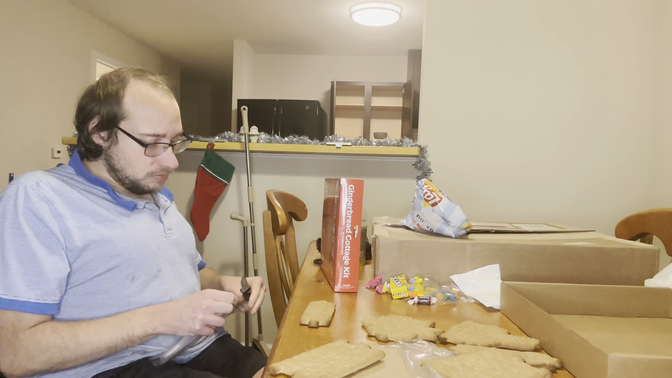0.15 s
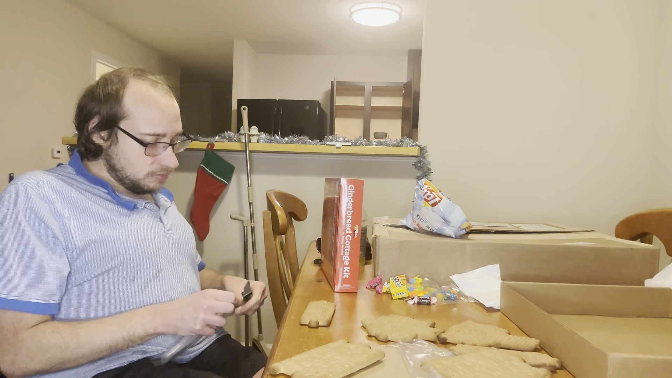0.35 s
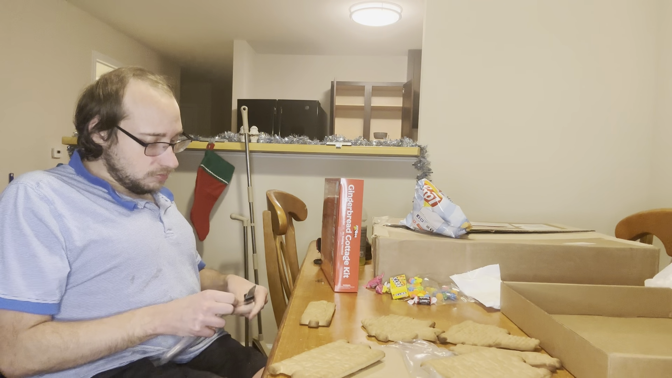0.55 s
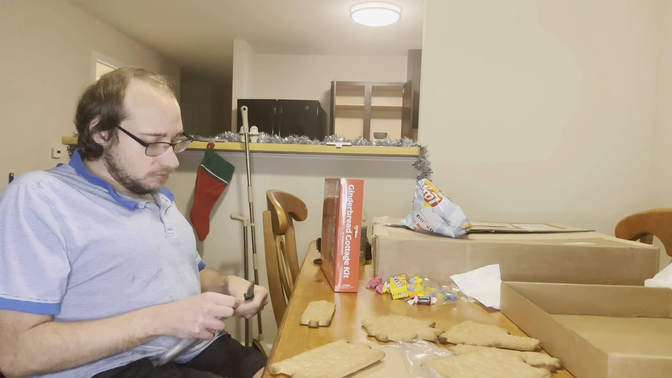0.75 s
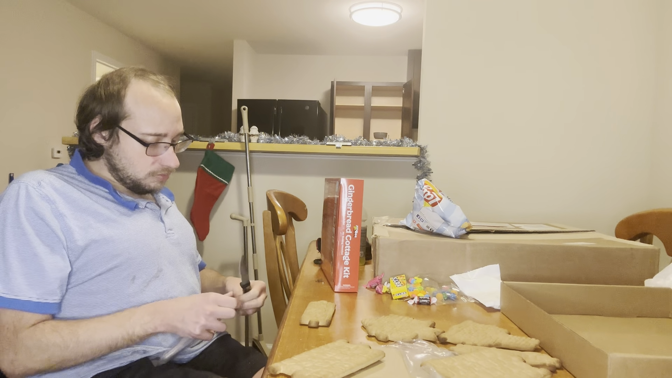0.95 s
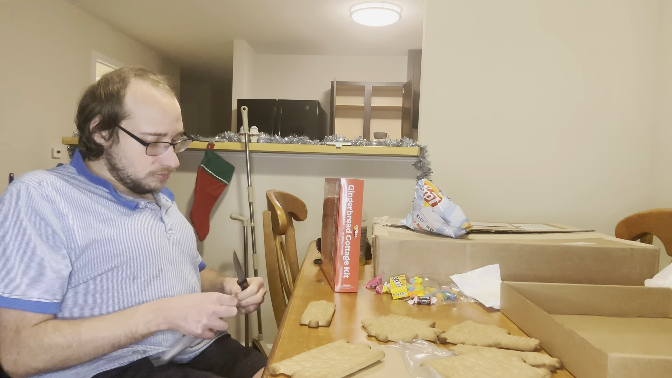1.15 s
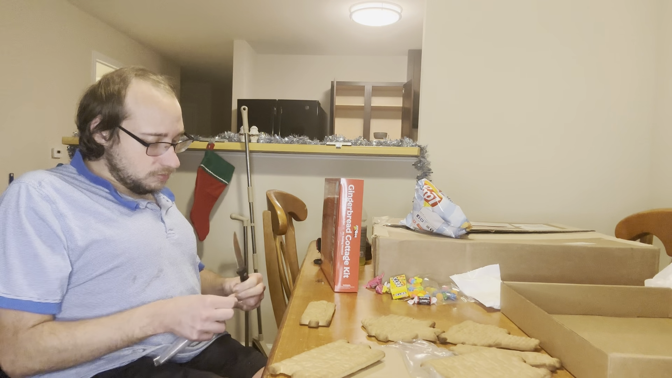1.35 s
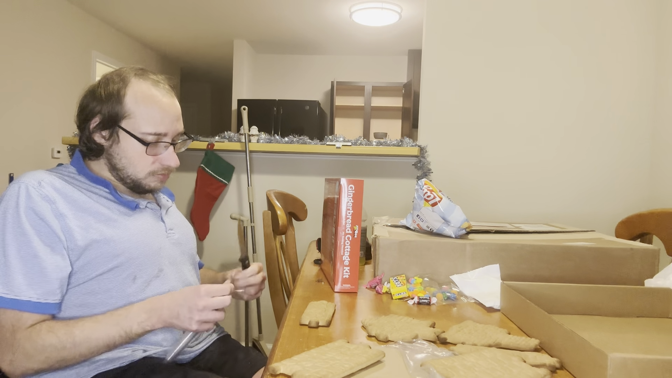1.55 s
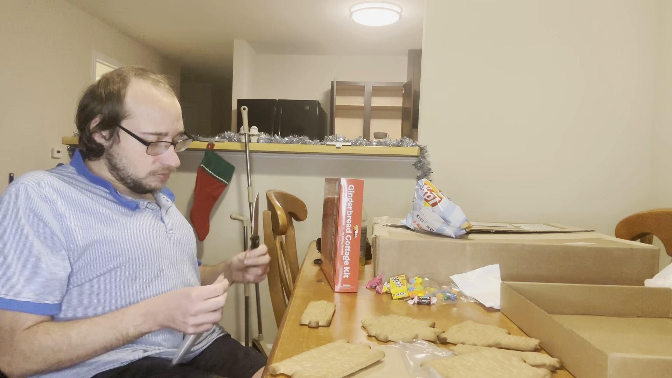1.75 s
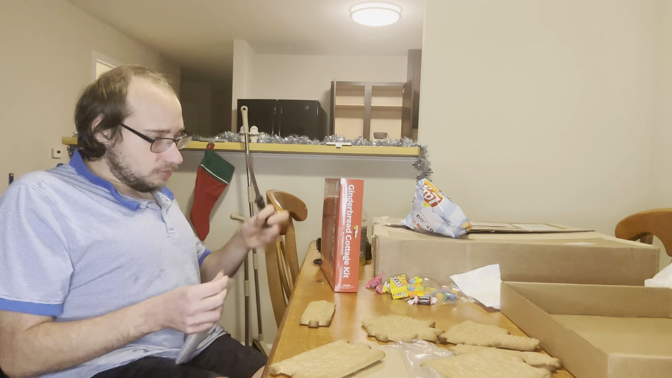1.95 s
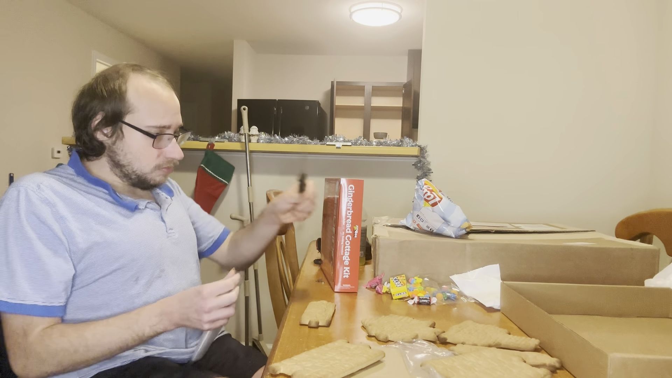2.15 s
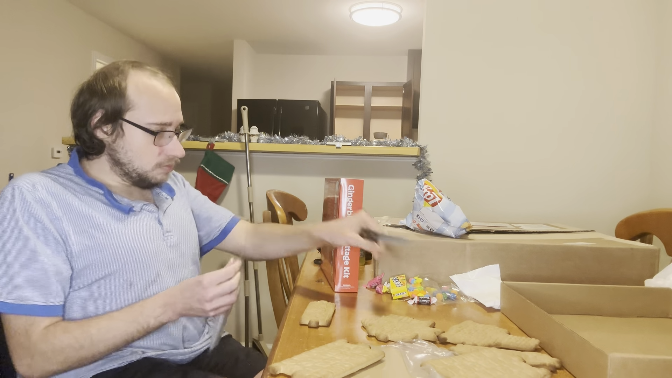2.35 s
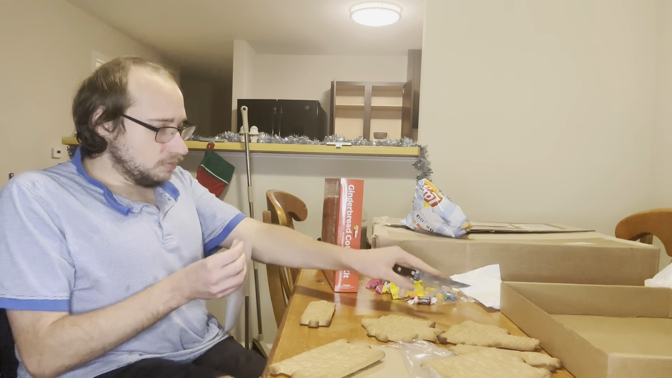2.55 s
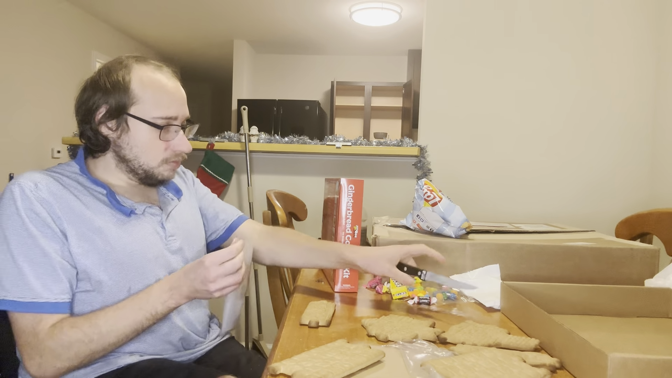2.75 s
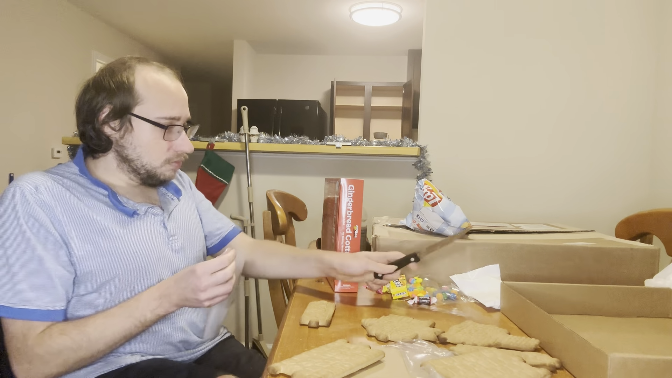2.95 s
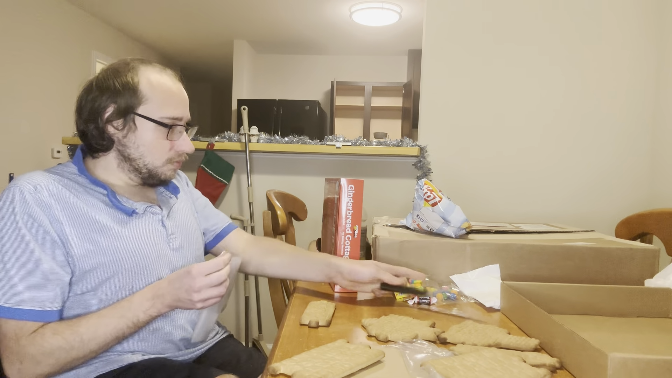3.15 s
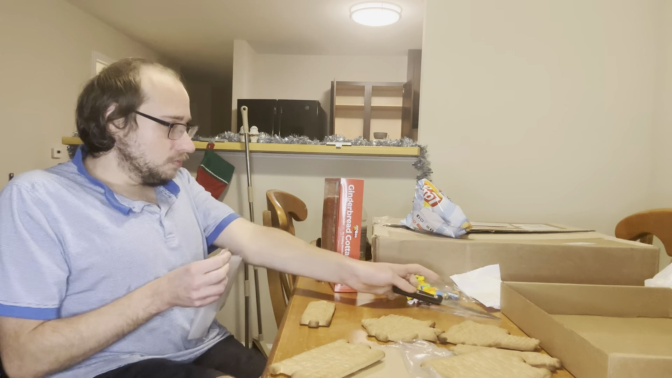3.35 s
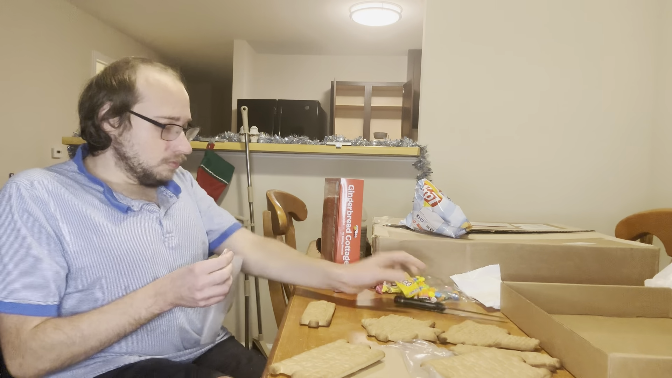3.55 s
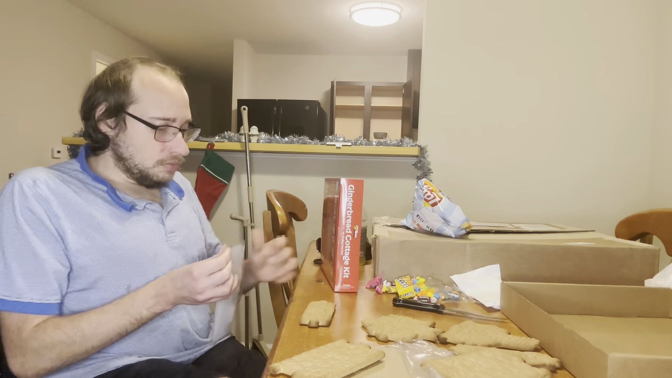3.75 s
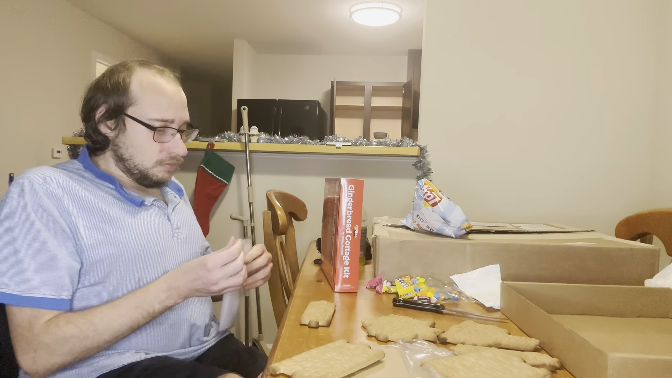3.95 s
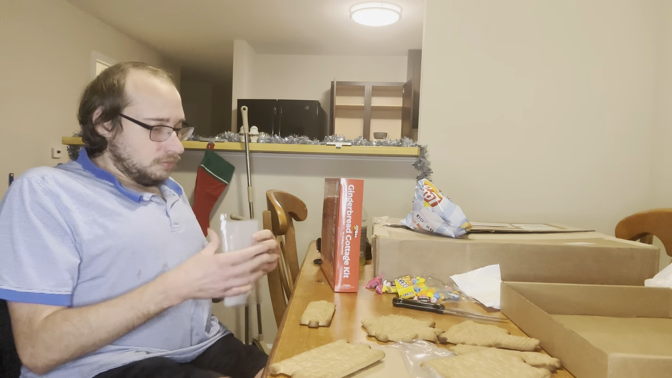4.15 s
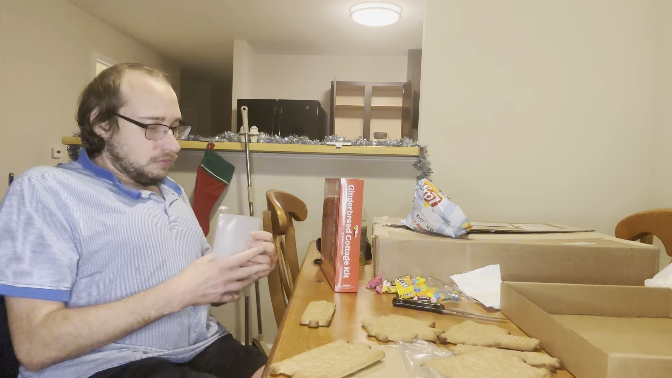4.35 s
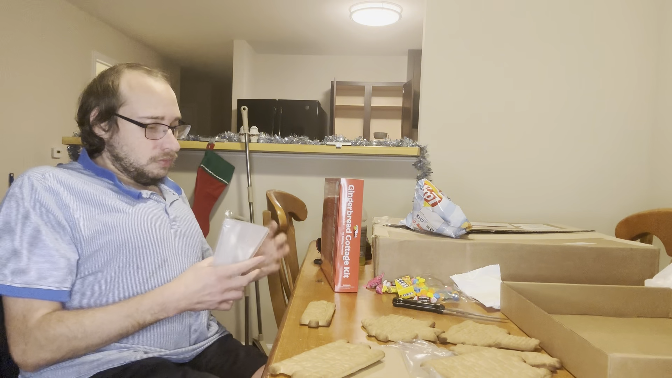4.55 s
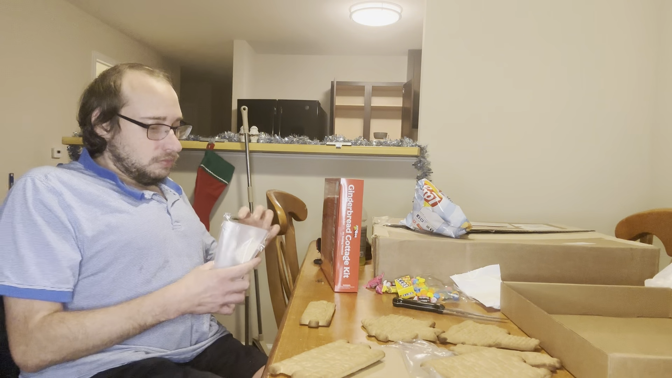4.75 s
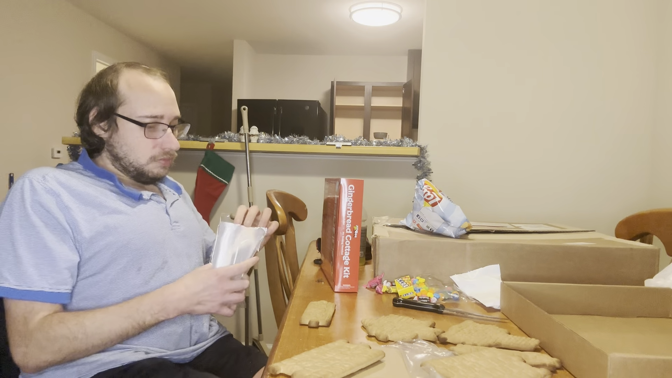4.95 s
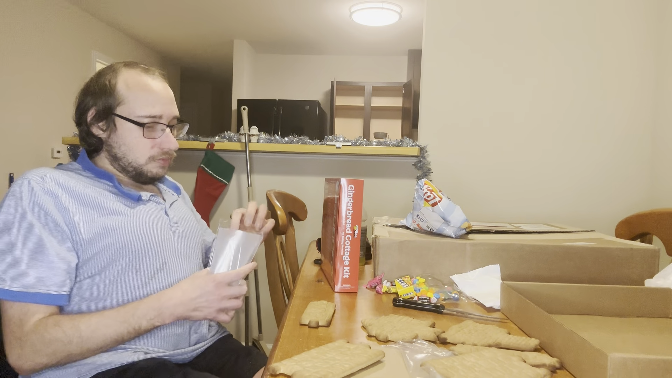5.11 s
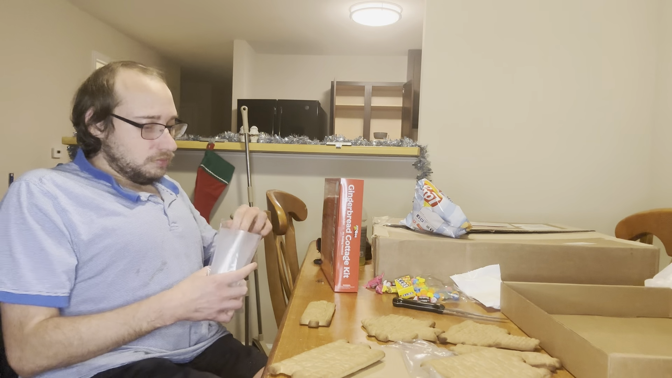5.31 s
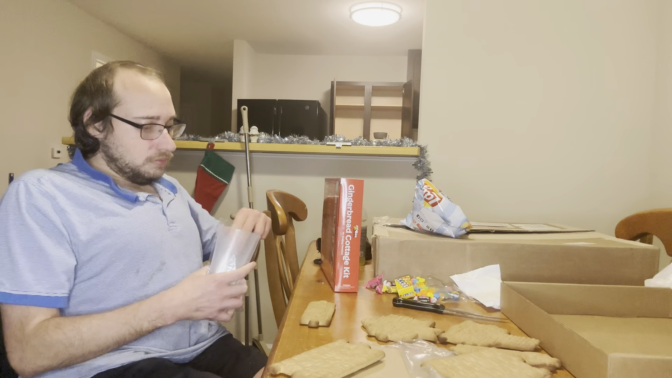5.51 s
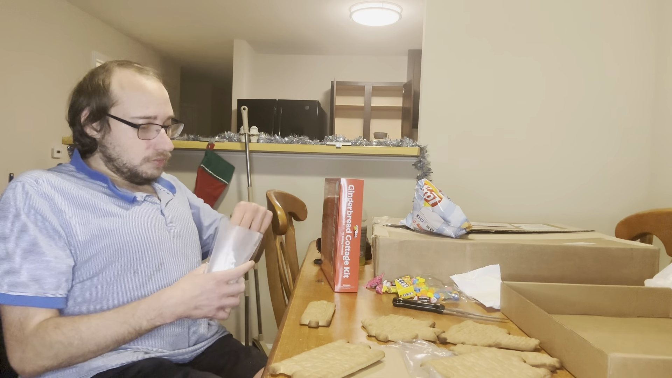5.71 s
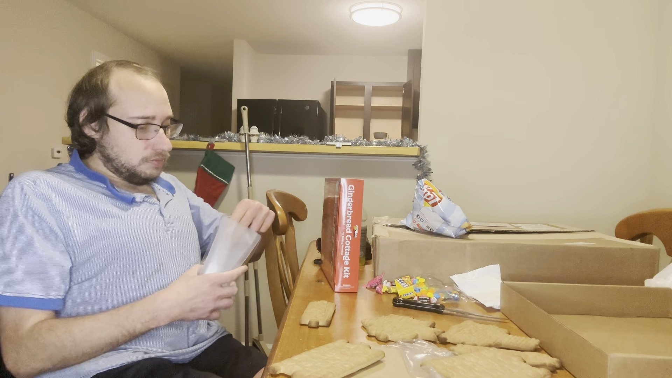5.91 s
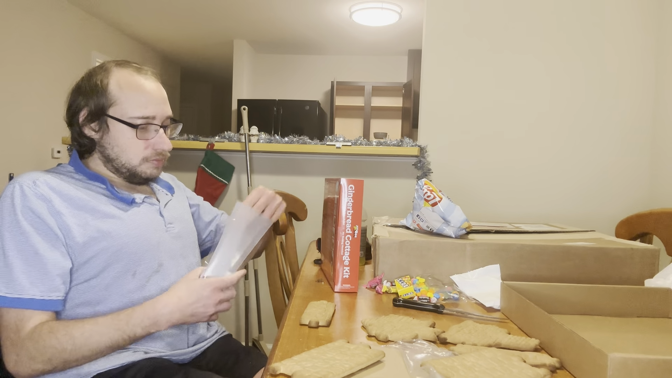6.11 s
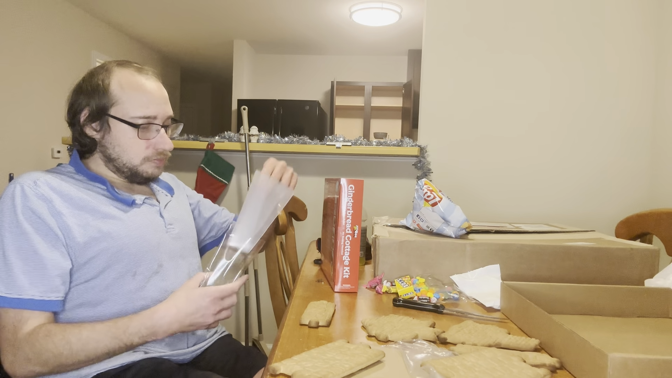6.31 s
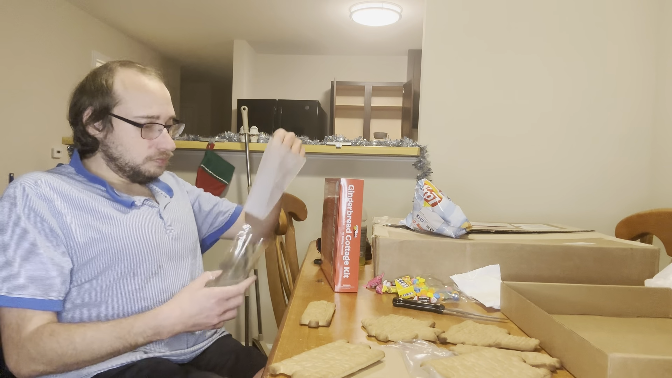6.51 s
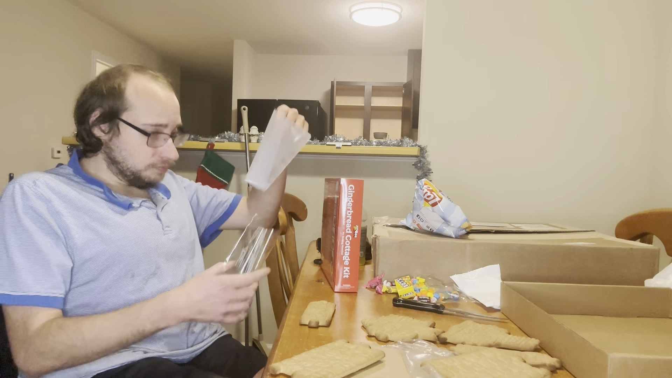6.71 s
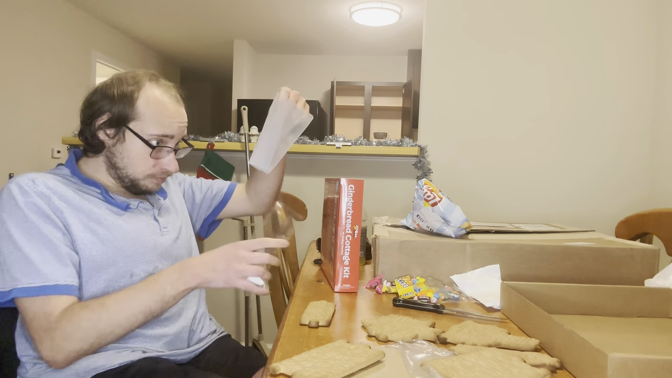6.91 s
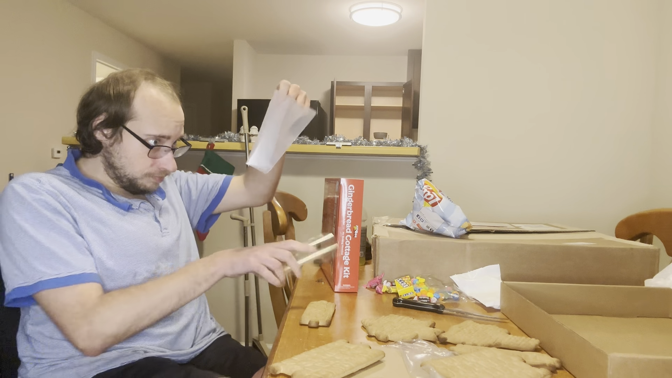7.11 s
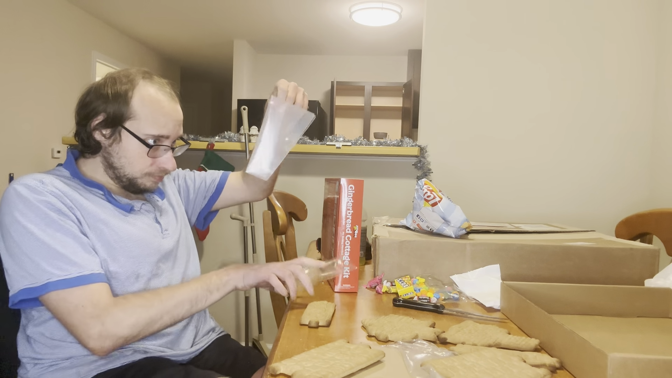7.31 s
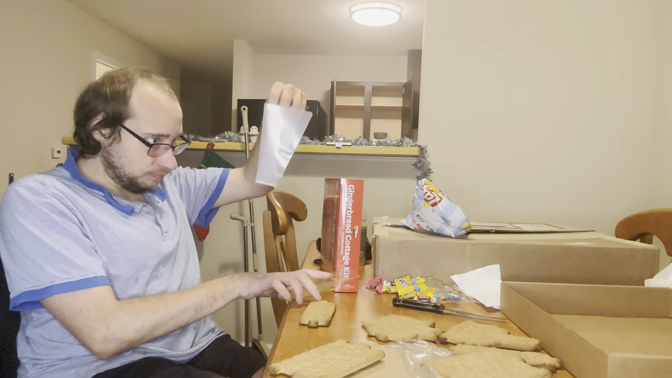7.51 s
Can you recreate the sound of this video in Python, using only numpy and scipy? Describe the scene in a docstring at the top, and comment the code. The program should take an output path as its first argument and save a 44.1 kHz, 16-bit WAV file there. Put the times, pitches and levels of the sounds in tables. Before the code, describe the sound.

In a small humming room, fingers fiddle with crisp film, set a knife down with woody knocks, and pull a rustling plastic bag from a tumbler.

```python
"""Thin plastic is fiddled with at a wooden table: creases snap by buckling and sliding film rustles by friction.
At about 3.2 to 3.7 s a knife is laid among sweet wrappers: decaying modes ring the table top, contacts clatter.
Then a plastic icing bag is pulled from a tumbler: more creases snap and most of the hollow panel pops come here.
Throughout, dry rubs are bands of noise and soft bumps dull resonances; a small live room answers by convolution,
over steady ventilation noise and the sine partials of a humming appliance."""
import sys
import numpy as np
from scipy import signal
from scipy.fft import rfft, irfft, next_fast_len
from scipy.io import wavfile
from scipy.ndimage import uniform_filter1d

SR = 44100
rng = np.random.default_rng(int(sys.argv[2]) if len(sys.argv) > 2 else 0)


def wav_out(sig):
    """Save sig, one row per channel (or a flat mono array), as 16-bit PCM at SR to the path in sys.argv[1]."""
    wavfile.write(sys.argv[1], SR, np.round(np.clip(np.atleast_2d(sig).T, -1, 1) * 32767).astype(np.int16))


N = 338247
T = np.arange(N) / SR


def undb(db):
    """Level to amplitude: 20 dB is a factor of ten."""
    return 10 ** (np.asarray(db) / 20)


def on_log(points, hz):
    """Interpolate (frequency [Hz], value) points on a logarithmic frequency axis."""
    f, value = np.transpose(points)
    return np.interp(np.log(np.maximum(hz, 1)), np.log(f), value)


def bins(size):
    """Frequencies [Hz] of the discrete spectrum of that many samples."""
    return np.arange(size // 2 + 1) * SR / size


def unit(x):
    """Normalise the effective value (rms) to 1."""
    return x / np.sqrt(np.mean(x ** 2))


def colour(x, spectrum):
    """Spectral shaping: weight each frequency, then normalise to rms 1."""
    size = x.shape[-1]
    return unit(irfft(rfft(x) * undb(on_log(spectrum, bins(size))), size))


def fade(t, t60):
    """Exponential decay, falling 60 dB in t60 [s]."""
    return np.exp(-np.log(1000) * t / np.maximum(t60, 1e-4))


def add(track, s, sound):
    """Linear superposition: mix a sound into a track at a time [s]."""
    i = max(int(s * SR), 0)
    track[i:i + len(sound)] += sound[:max(N - i, 0)]


def walk(rate, size=N):
    """Low-pass random modulation: twice-smoothed steps, drawn at a rate [Hz], at rms 1."""
    k = int(SR / rate)
    steps = np.repeat(rng.standard_normal(size // k + 1), k)
    return unit(uniform_filter1d(uniform_filter1d(steps, k), k)[:size])


def causal(db):
    """Minimum phase: fold the cepstrum to get the most compact causal pulse with this spectrum [dB]."""
    cepstrum = irfft(np.log(undb(db)))
    half = len(cepstrum) // 2
    cepstrum[1:half] *= 2
    cepstrum[half + 1:] = 0
    return irfft(np.exp(rfft(cepstrum)))


def no_bass(x, hz):
    """Inefficient radiation: thin, light things give hardly any bass."""
    return signal.sosfilt(signal.butter(4, hz, "highpass", fs=SR, output="sos"), x)


# Flanks of a facet's spectrum [dB per octave], scaled by its focus, and bluntness of its peak [dB]
FACET_RISE_DB, FACET_FALL_DB, FACET_ROUND_DB = 7, 7, 6.5
# Larger, lower facets buckle more softly: their treble falls faster
FACET_MID_HZ, FACET_SOFTNESS = 2780, 0.097
# This far below its pitch a facet is too small to radiate; it then falls by this much more per octave
FACET_CUT_OCTAVES, FACET_CUT_DB = 1.37, 16.5
SHIVER_CYCLES = 40  # cycles of its own pitch in which a facet's shiver falls 60 dB
# The loudest creases: (time [s], relative level [dB], pitch of the facet [Hz],
# size of the crumple that follows [1], focus [1]: 1 = broad click, 3 = narrow pitched tick)
CREASES = [(0.0211, -43, 5500, 1, 0.91), (.034, -45, 5500, 0.67, 1.7), (.319, -56, 5000, 0.44, 1.2),
           (.367, -53.5, 4500, 0.63, 0.94), (.441, -50.5, 7000, .8, 1), (0.535, -47, 4520, 1.7, 0.92),
           (0.7873, -48.5, 5970, 0.45, 3.1), (0.9285, -51, 3480, 0.85, 0.84), (1.005, -53, 5000, 0.47, 1),
           (1.0152, -41, 2560, 0.3, 1.5), (1.0366, -44.5, 1990, 0.56, 0.69),
           (1.1039, -38.5, 2220, 1.15, 1.24), (1.1595, -38.5, 4520, 0.54, 1.1), (1.19, -42.5, 4460, 1.3, 1),
           (1.226, -48, 6160, 0.28, 1.9), (1.2354, -42, 7500, .2, 1.8), (1.295, -40, 2400, 0.5, 1.5),
           (1.3313, -34, 5400, 0.22, 1.4), (1.3526, -36.5, 2440, .3, 0.57), (1.389, -29, 2830, 0.23, 1.56),
           (1.5144, -41.5, 3700, 0.6, 1.5), (1.5338, -42, 2640, 0.2, 0.46), (1.559, -45, 4670, .2, 3),
           (1.577, -38.5, 4800, 0.12, 1.6), (1.6058, -37.5, 5060, 0.21, 1.3),
           (1.6496, -35.5, 7900, 0.75, 0.95), (1.681, -37.5, 3080, 0.81, 1.3),
           (1.7427, -43, 6960, 0.17, 0.41), (1.938, -45.5, 1600, 0.28, 2.45), (2.3021, -55, 3460, 1.1, 1.7),
           (2.314, -55, 4820, 0.71, 3.3), (2.394, -57, 2780, .9, 2.2), (2.486, -60, 1800, 0.62, 1.6),
           (2.5154, -54, 1600, 1.2, 1.1), (2.6312, -65.5, 3000, 0.8, 0.56), (3.1552, -31, 1880, 0.49, 1.9),
           (3.1857, -20.5, 4960, 0.73, 2.5), (3.2005, -35.5, 5500, 0.41, 0.78),
           (3.2495, -27, 4950, 0.47, 2.1), (3.337, -44, 8000, 0.7, 1.8), (3.3603, -28, 1933, 1.54, 1.97),
           (3.406, -42, 7000, 0.26, 2), (3.4253, -27.5, 1300, 0.61, 0.82), (3.4486, -29, 2190, 0.17, 1.1),
           (3.5005, -39, 11000, 0.48, 2.6), (3.5335, -35, 5500, 0.69, 3), (3.5866, -31.5, 1850, 1.25, 0.67),
           (3.6784, -32.5, 1670, 0.5, 0.84), (3.862, -46, 2180, 0.54, 1.8), (3.954, -44, 2500, 0.69, 1.4),
           (3.9648, -44.5, 5640, .2, 0.7), (3.9843, -43, 5030, 0.21, 1.3), (4.013, -43.5, 3000, 0.44, 0.99),
           (4.0497, -29, 1620, 0.28, 0.9), (4.1175, -27, 1200, 0.21, 0.92),
           (4.1332, -35.5, 2970, 0.45, 1.8), (4.139, -37, 4570, 0.44, 2.3), (4.151, -45, 5030, .5, 2.7),
           (4.2525, -36, 1600, 0.53, 1.15), (4.3048, -31.5, 1444, 0.3, 0.93),
           (4.3455, -30.5, 1985, 0.5, 0.96), (4.359, -36, 4670, 0.41, 2.2), (4.393, -48, 3200, .5, 1.8),
           (4.4355, -30, 4050, 0.18, 0.75), (4.465, -35, 2200, 1.1, 0.8), (4.4776, -27.5, 3740, 0.25, 0.46),
           (4.509, -37, 1310, 0.67, 1.7), (4.5508, -28, 2600, 0.38, 0.57), (4.578, -31, 1500, 0.93, 1.03),
           (4.589, -30.5, 4470, 0.35, 1.7), (4.597, -31.5, 4270, 0.17, 2.4),
           (4.6989, -36.5, 3600, 0.64, 1.3), (4.705, -48.5, 3370, 0.35, 2.3),
           (4.9212, -42, 2840, 0.2, 0.37), (5.0843, -43, 2180, 0.3, 0.63), (5.1374, -38, 1477, 1.7, 0.75),
           (5.156, -33.5, 4620, 0.18, 2.6), (5.173, -36, 4400, 0.18, 1.7), (5.199, -26.5, 4500, 0.11, 1.04),
           (5.386, -43.5, 2570, 0.2, 1.4), (5.4556, -41.5, 7000, 0.42, 0.51),
           (5.515, -40, 1990, 0.37, 0.95), (5.5628, -31.5, 6600, 0.53, 2.1), (5.658, -46.5, 2580, .3, 2.5),
           (5.723, -46.5, 2720, 1.2, 2), (5.7686, -41, 2000, .8, 1.2), (5.7917, -37.5, 4520, 0.25, 2),
           (5.8096, -28, 3220, 0.32, 1.28), (5.882, -44, 2000, .5, 1.3), (5.9396, -28, 2970, 0.23, 1.15),
           (5.9544, -35, 1810, 0.52, 1.7), (6.0369, -37, 1890, 1.7, 1.2), (6.048, -45, 1815, 0.62, 1.7),
           (6.0773, -37, 5000, .4, 1.5), (6.109, -31, 2600, 0.51, 0.48), (6.1505, -36, 1900, 0.57, 0.63),
           (6.1636, -30.5, 1760, 1, 0.48), (6.216, -35, 2176, .4, 3.8), (6.3948, -31, 2110, 0.28, 1.7),
           (6.406, -33, 2970, 0.36, 1.05), (6.4504, -40, 1730, 1.5, 0.96), (6.459, -45, 1700, 0.54, 1.1),
           (6.483, -39, 1480, .5, 1.1), (6.6425, -41, 2520, 1.3, 1.2), (6.685, -43.5, 4200, .7, 1.4),
           (6.98, -42, 1900, 1.27, 0.84), (7.077, -44, 2100, .3, 2.3), (7.1781, -40, 2600, 1.2, 1.8),
           (7.2202, -19, 3770, 0.06, 1.14), (7.2742, -29, 1550, 0.12, 1.1), (7.4179, -41, 3600, 0.6, 1.1),
           (7.4571, -39, 2485, 0.28, 1.5), (7.480, -38, 4500, .2, 1.7), (7.4946, -35, 1740, 0.1, 0.54),
           (7.5366, -24.5, 3170, 0.18, 1.1), (7.5537, -30.5, 5160, 0.13, 1.2),
           (7.5869, -23, 4830, 0.1, 2.1), (7.6088, -39, 3480, 0.61, 1.3), (7.6273, -25.5, 2950, 0.53, 0.79),
           (7.633, -37, 2400, 0.55, 0.86)]


def snaps(creases, gain_db=26.5, top_db=3.0, crumple_t60=0.044, shiver_share=0.73, ripple_db=1.26, size=2048):
    """Buckling: a sharp pulse coloured by its facet; the film shivers, and neighbouring creases give way."""
    out, hz, t = np.zeros(N), bins(size), T[:size]
    sheen_db = on_log([(6000, 0.014), (12000, top_db)], hz)
    for s, level, pitch, crumple, focus in creases:
        octave = np.log2(np.clip(hz, 400, 16000) / pitch)
        soft = (FACET_MID_HZ / pitch) ** FACET_SOFTNESS
        skirts = focus * np.minimum(FACET_RISE_DB * octave, -FACET_FALL_DB * soft * octave)
        cut = FACET_CUT_DB * np.maximum(-octave - FACET_CUT_OCTAVES, 0)
        outline = level - np.minimum(np.hypot(skirts, FACET_ROUND_DB) + cut, 60) + sheen_db
        facet_db = ripple_db * unit(uniform_filter1d(rng.standard_normal(len(hz)), size=60))
        shiver = rng.standard_normal(size) * fade(t, SHIVER_CYCLES / pitch) * (1 - fade(t, .002))
        # sparse, uneven pulses: the neighbouring creases
        followers = rng.standard_normal(size) ** 3 * (rng.random(size) < .04) * fade(t, crumple_t60)
        share = np.clip(shiver_share * soft, 0, .95)
        push = share * shiver / np.linalg.norm(shiver)
        push += crumple * followers / np.linalg.norm(followers)
        push[0] = np.sqrt(1 - share ** 2)  # the sharp first pulse
        add(out, s, signal.fftconvolve(causal(outline + facet_db), push))
    return out * undb(gain_db)


# Lesser creases before the gain of snaps(): level above the effort and its scatter [dB], middle pitch [Hz]
SMALL_SNAP_DB, SMALL_SPREAD_DB, SMALL_SNAP_HZ = 14.5, 8, 3400
SMALL_FLOOR_DB = -70  # weaker ones are left out


def small_snaps(effort, octaves=1.26, crumple=0.28, focus=2.9, count=380):
    """Random buckling: creases of scattered pitch give way as strongly as the film is being crumpled."""
    moment, strength, facet = rng.uniform(-0.91, 1, (count, 3)).T
    at = ((moment + 1) / 2 * (N - 1)).astype(int)
    level = 20 * np.log10(effort[at] + 1e-12) + SMALL_SNAP_DB + SMALL_SPREAD_DB * strength
    pitch = SMALL_SNAP_HZ * 2 ** (octaves * facet)
    return [(i / SR, db, hz, crumple, focus) for i, db, hz in zip(at, level, pitch) if db > SMALL_FLOOR_DB]


GRIP_S, RELEASE_T60_S = 0.0021, 0.064  # the fingers take hold quickly; the film settles when they stop
# Spells of handling the plastic: (start [s], length [s], relative hiss level [dB],
# relative level of the sheet's body [dB], share that crumples rather than glides [0-1])
HANDLING_SPELLS = [(0, 0.04, -52, -61, 0.03), (0.119, 0.11, -71, -65, 0.74), (0.312, 0.028, -70, -66, 0.7),
                   (0.363, 0.039, -67.5, -60.5, 0.75), (0.43, 0.15, -61, -62, 0.3),
                   (0.766, 0.35, -71, -66, 0.68), (1.012, 0.06, -65, -57.5, 0.74),
                   (1.102, 0.035, -60, -61, 0.67), (1.154, 0.11, -52, -59.5, 0.55),
                   (1.252, 0.06, -57, -56, .5), (1.341, 0.059, -54, -58, 0.53),
                   (1.428, 0.068, -76, -67, .6), (1.519, 0.052, -64, -59.5, 0.86),
                   (1.6, 0.074, -74, -61, .8), (1.674, 0.04, -64, -54, 0.8),
                   (2.173, 0.047, -64.5, -78, 0.52), (2.288, .06, -76, -69, 0.2),
                   (2.39, 0.024, -78, -74, 0.37), (2.48, 0.068, -79.5, -68, 0.46),
                   (3.113, 0.021, -68, -72, 0.8), (3.135, 0.016, -66, -51, 0.9),
                   (3.149, 0.029, -49.5, -46, 0.5), (3.199, 0.093, -59, -64, 0.2),
                   (3.277, .2, -54, -50, 0.68), (3.344, 0.015, -45, -52, 0.74),
                   (3.469, 0.197, -56, -41.5, 0.78), (3.792, 0.2, -74.5, -57.5, 0.92),
                   (3.942, 0.082, -56.5, -57, 0.6), (4.067, 0.31, -65.5, -73, 0.91),
                   (4.119, 0.031, -50.5, -51.5, 0.6), (4.287, 0.109, -62.5, -55.5, 1),
                   (4.433, 0.082, -56, -54, 0.88), (4.546, 0.054, -64, -52.5, 0.7),
                   (5.034, 0.13, -61, -61, 0.99), (5.086, 0.16, -64, -55, 0.65),
                   (5.477, 0.32, -66, -60.5, 0.94), (5.782, 0.21, -59, -62, 0.6),
                   (6.03, 0.067, -56, -52, 0.87), (6.103, 0.029, -50.5, -52, 0.77),
                   (6.142, 0.093, -49.5, -56.5, 0.66), (6.297, 0.02, -53, -51.5, 0.7),
                   (6.324, 0.18, -59, -60, 0.4), (6.484, 0.43, -60, -66, 0.27),
                   (6.92, 0.24, -61, -66.5, 0.26), (7.173, 0.19, -61, -59.5, 0.1),
                   (7.404, 0.32, -62, -54.5, 0.97)]


def handling(size=32768):
    """Energy addition: spells rise, hold and decay; gives gains of hiss and body, and the crumpling share."""
    hiss, sheet, crumpling = np.full((3, N), 1e-14)
    t = T[:size]
    for s, length, hiss_db, sheet_db, share in HANDLING_SPELLS:
        power = (np.minimum(t / GRIP_S, 1) * fade(np.maximum(t - length, 0), RELEASE_T60_S)) ** 2
        add(hiss, s, power * undb(hiss_db) ** 2)
        add(sheet, s, power * undb(sheet_db) ** 2)
        add(crumpling, s, power * undb(hiss_db) ** 2 * share)
    return np.sqrt(hiss), np.sqrt(sheet), np.clip(crumpling / hiss, 0, 1)


def crackle(rate, spread_db):
    """Impulse noise: tiny buckles at random moments, rate [1/s], a few of them much larger."""
    chance, strength = rng.random(N), np.minimum(rng.exponential(size=N), 4)
    return unit((chance < rate / SR) * undb(spread_db * strength) * rng.choice([-1, 1], N))


def facets(rate=160, spread_db=5):
    """Independent bands: creases of different sizes crackle separately, each size in its own octave."""
    octave = np.log2(np.clip(bins(N), 750, 12000) / 750)
    shares = [np.sqrt(np.maximum(1 - abs(octave - k), 0)) for k in range(5)]
    return unit(irfft(sum(share * rfft(crackle(rate, spread_db)) for share in shares), N))


# Spectrum of the friction hiss: (frequency [Hz], relative density [dB])
HISS_SPECTRUM = [(1200, -2), (2500, 1.5), (4800, 3), (7000, 1), (9500, 0.5), (12800, -2), (14500, -3),
                 (16000, -28)]
# Spectrum of the body of the sheet: (frequency [Hz], relative density [dB])
SHEET_SPECTRUM = [(150, -3.5), (350, 8.5), (800, 7.5), (1300, 3.5), (2200, -5.5), (3500, -7.5), (7000, -63)]


def rustle(hiss, sheet, share, sheet_db=-1.5, slip_db=5.0):
    """Jerky friction: crackle and smooth noise drive a hiss and, more smoothly, the broad body of the sheet."""
    grains = unit(facets() + crackle(rate=650, spread_db=4) / 2)
    friction = rng.standard_normal(N)
    jerks = undb(slip_db * share * walk(45))
    crisp = (np.sqrt(share) * grains + np.sqrt(1 - share) * friction) * jerks
    soft = (share * grains + np.sqrt(2 - share ** 2) * friction) * jerks
    return colour(crisp, HISS_SPECTRUM) * hiss + colour(soft, SHEET_SPECTRUM) * sheet * undb(sheet_db)


POP_T60_S, POP_SAG = .021, 0.025  # ring time; share of its pitch that a panel loses as it relaxes
# A panel of the bag flips with a hollow pop: (time [s], relative level [dB], pitch [Hz])
PANEL_POPS = [(1.261, -40.5, 1410), (4.0869, -42, 1360), (4.136, -37.5, 1370), (4.252, -38, 1310),
              (4.3826, -44.5, 890), (4.4336, -33, 1206), (4.508, -32.5, 1420), (4.512, -34.5, 1150),
              (4.55, -34, 1300), (4.579, -37.5, 870), (5.085, -35, 1295), (5.0971, -40, 1354),
              (5.136, -33.5, 970), (5.157, -49, 1060), (5.258, -44.5, 1270), (5.658, -49, 1240),
              (5.722, -47, 1093), (5.842, -47, 1330), (5.955, -41, 1364), (6.0375, -42, 2030),
              (6.111, -39, 2015), (6.163, -35, 1750), (6.164, -38, 1260), (6.215, -42, 2300),
              (6.976, -45, 1470)]


def pops(gain_db=3.0, rise_s=0.0022, other_modes_db=-8, size=8192):
    """Snap-through: a flipped panel rings briefly with lesser modes; the pitch sags as the tension lets go."""
    out, t = np.zeros(N), T[:size]
    for s, level, hz in PANEL_POPS:
        pitch = hz * (1 + POP_SAG * (fade(t, 2 * POP_T60_S) - .5))
        phase = 2 * np.pi * np.cumsum(pitch) / SR
        ratios = rng.uniform([.65, 1.2, 1.6], [.85, 1.55, 2.4])
        lesser = sum(np.sin(r * phase) / max(r, 1) for r in ratios)
        ring = np.sin(phase) + undb(other_modes_db) * lesser
        add(out, s, undb(level + gain_db) * ring * fade(t, POP_T60_S) * (1 - fade(t, rise_s)))
    return out


# Short dry rubs of fingers, knife and sleeve:
# (time [s], length [s], relative level [dB], pitch [Hz], half width [octaves])
DRY_RUBS = [(0.019, 0.018, -59, 2580, 0.93), (.128, 0.019, -62.5, 2060, 0.23),
            (0.53, 0.014, -55.5, 2120, 0.29), (0.562, 0.018, -71, 2000, 0.65),
            (0.922, 0.0086, -56.5, 2010, 0.67), (1.192, .012, -53.5, 1113, .4),
            (1.391, 0.028, -54, 2640, .17), (1.938, 0.053, -73, 1900, 0.62),
            (2.185, 0.0097, -63, 5120, 0.12), (3.241, 0.013, -41, 4860, 0.2), (6.298, .028, -54, 1600, 1),
            (6.587, 0.11, -67, 3200, 0.26), (6.957, 0.037, -57, 1930, 0.94), (7.417, 0.045, -50, 325, 0.19),
            (7.418, .024, -59, 760, 0.34), (7.456, 0.011, -60, 714, 0.34), (7.615, .06, -50, 297, 0.86)]


def rubs(rise_s=0.0052, release_t60=0.032, size=8192):
    """Friction-driven resonance: noise excites one band for as long as a surface slides."""
    out, t = np.zeros(N), T[:size]
    for s, length, level, pitch, width in DRY_RUBS:
        octave = np.log2(np.maximum(bins(size), 1) / pitch)
        band = unit(irfft(rfft(rng.standard_normal(size)) / (1 + np.abs(octave / width) ** 3)))
        stroke = np.minimum(t / rise_s, 1) * fade(np.maximum(t - length, 0), release_t60)
        add(out, s, band * stroke * undb(level))
    return out


TREBLE_HZ = 7300
# Gain of the plastic's treble: (time [s], gain [dB])
TREBLE_GAIN = [(0, 0.5), (.5, -3), (1, 9), (1.4, -3), (2.2, 7.5), (3.25, 5), (3.6, 2.5), (4.1, 1.5),
               (4.5, -3), (5.6, 0.5), (6.2, -2.5), (6.8, -4), (7.25, -6.5), (7.6, -12)]


def brighten(x):
    """Time-varying shelving: the treble of the plastic rises and falls, and is dullest at the end."""
    treble = signal.sosfiltfilt(signal.butter(2, TREBLE_HZ, "highpass", fs=SR, output="sos"), x)
    return x + treble * (undb(np.interp(T, *np.transpose(TREBLE_GAIN))) - 1)


THUD_T60_S, THUD_WOBBLE = .055, .13  # ring time; share by which a thud's pitch wavers as the load rocks
CLATTER_RATE = 1400  # tiny contacts per second while the knife and wrappers settle
# Knife and hand meeting the table: (time [s], relative ring level [dB], relative clatter level [dB],
# ring t60 [s], relative thud level of the spot that is hit [dB], pitch of the spot [Hz])
TABLE_KNOCKS = [(3.186, -38, -31, 0.084, -23.5, 606), (3.197, -30, -29, 0.12, -27.5, 328),
                (3.256, -34, -38, 0.074, -23, 630), (3.426, -20, -30.5, 0.038, -16.5, 694),
                (3.4354, -21, -25, 0.083, -12, 546), (3.446, -18.5, -27, 0.078, -20.5, 562),
                (3.478, -33.5, -38, 0.089, -29, 1230), (3.503, -33, -50, 0.092, -24.5, 583),
                (3.585, -27, -28.5, 0.059, -28, 555), (3.598, -25, -30.5, 0.17, -19.5, 680),
                (3.622, -38, -32, 0.068, -30, 584), (3.66, -27.5, -44, 0.13, -24.5, 694),
                (3.688, -35, -32, 0.12, -33.5, 546), (3.718, -38, -39, 0.092, -33, 692)]
# Modes of the table top: (frequency [Hz], relative level [dB], share of the ring time [1])
TOP_MODES = [(173, -11, 1), (289, -16, 1.7), (355.4, -9, 4.2), (410, -29, 0.33), (555, 6.5, 0.23),
             (541, 5.5, 0.65), (588, -22, .9), (606, 3.5, 1.14), (693, 4, 1.26), (753, -6, 1.33),
             (958, -7.5, 1.9), (1142, 2.5, 0.75)]
# Spectrum of the clatter: (frequency [Hz], relative density [dB])
CLATTER_SPECTRUM = [(120, -44), (300, -30), (800, -9.5), (1300, 0), (2100, -4), (3000, -12.5), (4500, -20),
                    (9000, -67)]


def knocks(thud_db=-.5, clatter_t60=0.1, contact_s=0.0084, clump_db=3, size=16384):
    """Modal impact: a blow thuds at its spot and rings the top while the knife and wrappers clatter on it."""
    out, t = np.zeros(N), T[:size]
    hz, db, share = np.transpose(TOP_MODES)[:, :, None]
    weight = undb(db) / np.linalg.norm(undb(db))
    for s, level, clatter, t60, thud, pitch in TABLE_KNOCKS:
        # the hand loads the top differently at every blow
        phase = 2 * np.pi * rng.random(hz.shape)
        loaded_hz = hz * (1 + .035 * rng.standard_normal(hz.shape))
        modes = weight * np.sin(2 * np.pi * loaded_hz * t + phase) * fade(t, t60 * share)
        ring = np.sum(modes, axis=0)
        contacts = rng.standard_normal(size) * (rng.random(size) < CLATTER_RATE / SR)
        clumped = contacts * undb(clump_db * walk(110, size=size))
        rattle = colour(clumped, CLATTER_SPECTRUM) * fade(t, clatter_t60)
        rocking = pitch * (1 + THUD_WOBBLE * walk(300, size=size))
        spot = np.sin(2 * np.pi * np.cumsum(rocking) / SR) * fade(t, THUD_T60_S)
        blow = ring * undb(level) + rattle * undb(clatter) + spot * undb(thud + thud_db)
        add(out, s, blow * (1 - fade(t, contact_s)))
    return out


# Soft bumps of arms, hands and tumbler: (time [s], relative level [dB], pitch [Hz])
SOFT_BUMPS = [(0.005, -39, 53.7), (0.546, -38, 68.6), (0.739, -31.5, 47.5), (0.857, -39, 52),
              (1.327, -30.5, 46.3), (1.451, -48, 44), (1.887, -38, 56.5), (3.19, -33.5, 282),
              (3.215, -41, 56), (3.43, -29.5, 290), (3.452, -40.5, 57.4), (3.65, -28.5, 129),
              (5.001, -40, 61), (5.056, -39.5, 81), (7.41, -43.5, 150), (7.598, -38.5, 104)]


def bumps(gain_db=2, rise_s=0.21, decay_t60=0.25, size=32768):
    """Heavily damped resonance: a soft push swells into a dull, broad hump of noise."""
    out, t = np.zeros(N), T[:size]
    envelope = fade(t, decay_t60) * (1 - fade(t, rise_s))
    for s, level, hz in SOFT_BUMPS:
        hump = [(hz / 4, -30), (hz / 1.6, -7), (hz, 0), (hz * 1.4, -9),
                (hz * 3, -27), (hz * 12, -65), (hz * 20, -90)]
        add(out, s, colour(rng.standard_normal(size), hump) * undb(level + gain_db) * envelope)
    return out


def from_right(x, lag_s=0.00015, shadow_db=-1.0):
    """Time and level difference: a source on the right reaches the left port later and weaker."""
    return np.array([np.interp(T - lag_s, T, x) * undb(shadow_db), x])


# Likeness of the diffuse sound in left and right: wide below, nearly one in the high treble
# (frequency [Hz], correlation [0-1])
SIDE_LIKENESS = [(50, 0.86), (250, 0.72), (600, 0.06), (2000, 0.018), (5000, 0.03), (7500, 0.044),
                 (9000, 0.97), (16000, 1)]


def diffuse(size):
    """Partial coherence: noise from all sides, its correlation between left and right set by frequency."""
    like = np.clip(on_log(SIDE_LIKENESS, bins(size)), 0, .995)
    mid, side = rfft(rng.standard_normal((2, size))) * np.sqrt([1 + like, 1 - like])
    return unit(irfft([mid + side, mid - side], size))


# Reverberation time of the room: (frequency [Hz], t60 [s])
ROOM_DECAY = [(100, 1), (500, 0.69), (2000, 0.46), (6000, 0.42), (15000, 0.23)]


def room(x, build_s=0.0016, size=32768):
    """Reverberation: convolution with a dense tail of small-room reflections; the treble dies first."""
    t, hz, noise = T[:size], bins(size), rfft(diffuse(size))
    centres, t60s = np.transpose(ROOM_DECAY)
    bands = [on_log(np.column_stack([centres, one]), hz) for one in np.eye(len(centres))]
    tail = sum(irfft(noise * band) * fade(t, t60) for band, t60 in zip(bands, t60s))
    tail = tail * (1 - fade(t, build_s))
    return signal.fftconvolve(x[None], tail / np.linalg.norm(tail[0]), axes=1)[:, :N]


# Spectrum of the ventilation noise: (frequency [Hz], relative density [dB])
AIR_SPECTRUM = [(15, -48), (25, -42), (45, -2), (70, 3), (87, -16), (123, -4), (206, -9), (394, -3.5),
                (476, -15.5), (531, -15), (641, -10.5), (714, -17), (1650, -33), (2000, -40),
                (16000, -48.5)]
# Partials of the appliance hum: (frequency [Hz], level before the waver [dB rms])
HUM_PARTIALS = [(59.3, -66), (119.8, -63), (186, -84.5), (299, -75.5), (357, -71), (399, -66.5), (532, -75)]


def background(air_db=-59.5, waver_db=1.54):
    """Stationary noise and line spectrum: steady ventilation and the slightly wavering hum of an appliance."""
    hum = np.zeros(N)
    for hz, db in HUM_PARTIALS:
        level = np.sqrt(2) * undb(db + waver_db * walk(3.23))
        hum += level * np.sin(2 * np.pi * hz * T + 0.5 * walk(7.9))
    return hum + colour(diffuse(N), AIR_SPECTRUM) * undb(air_db)


SWAY_HZ = 1.3  # how fast the moving hands change the pattern of reflections


def scene(film_room_db=-2, table_room_db=-3.0, bump_room_db=-10):
    """Superposition: direct plastic, table and bumps, their reflections, and the background."""
    hiss, sheet, share = handling()
    crinkle = snaps(small_snaps(hiss * share)) + pops() + rubs() + rustle(hiss, sheet, share)
    film = no_bass(brighten(crinkle + snaps(CREASES)), 150)
    # the room gathers a snap from all directions, which evens out its colour
    all_round = no_bass(brighten(crinkle + snaps(CREASES, shiver_share=.1, ripple_db=0)), 150)
    table = no_bass(knocks(), 170)
    soft = bumps()
    sent = all_round * undb(film_room_db) + table * undb(table_room_db) + soft * undb(bump_room_db)
    # two independent patterns of reflections trade places
    sway = 2 * np.pi * SWAY_HZ * T
    reflections = room(sent * np.cos(sway)) + room(sent * np.sin(sway))
    return film + from_right(table) + soft + reflections + background()


TOP_HZ = 16200  # frequency [Hz] above which the sound is cut
# Level difference of the ports: (frequency [Hz], left minus right [dB])
PORT_TILT = [(60, 1), (110, 7.5), (200, 0.5), (380, 0), (700, 0.1), (1300, -0.5), (2400, 1), (7000, -1.4),
             (10000, 0)]
# Phase difference of the ports: (frequency [Hz], lead of the left [rad])
PORT_LEAD = [(20, 0), (2000, .2), (5000, 1.4), (8000, 1.6), (9300, 3.14), (11900, 6.28), (14500, 9.42),
             (16000, 11)]


def record(dry):
    """Transfer function: two ports differ in level and drift apart in phase to the treble; the top is cut."""
    size = next_fast_len(N + SR)
    hz, sides = bins(size), np.array([[.5], [-.5]])
    response = undb(sides * on_log(PORT_TILT, hz)) * np.exp(1j * sides * on_log(PORT_LEAD, hz))
    ports = irfft(rfft(dry, size) * response, size)[:, :N]
    return signal.sosfilt(signal.ellip(8, .2, 70, TOP_HZ, fs=SR, output="sos"), ports)


dry = scene()
out = record(dry)
wav_out(out)
```